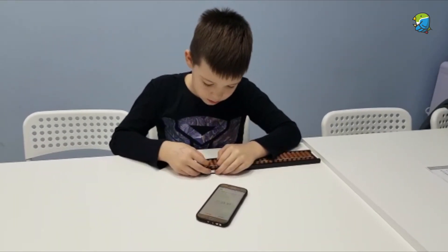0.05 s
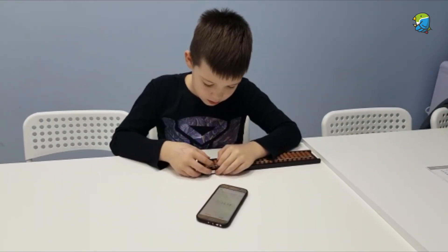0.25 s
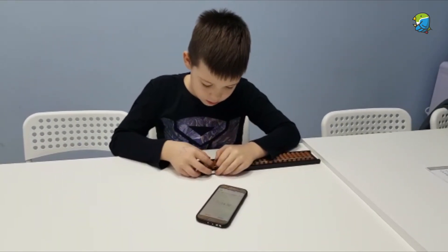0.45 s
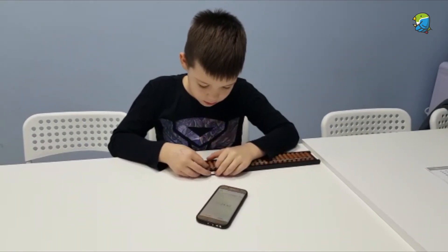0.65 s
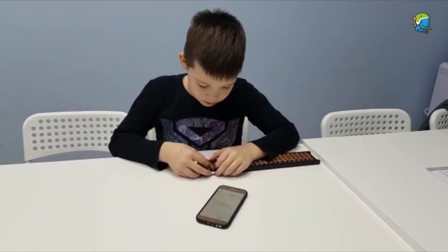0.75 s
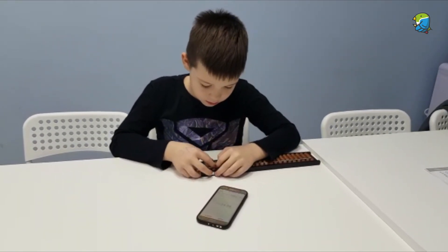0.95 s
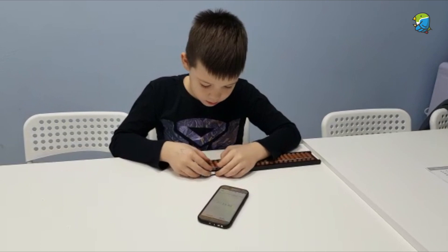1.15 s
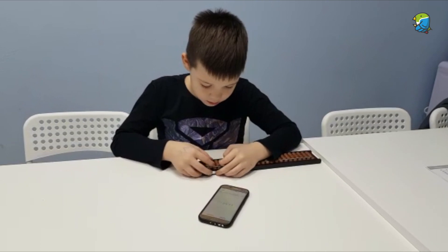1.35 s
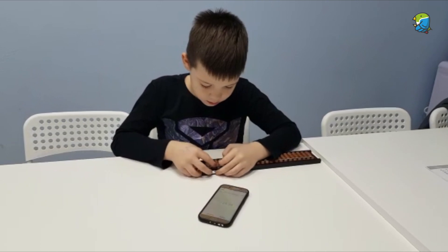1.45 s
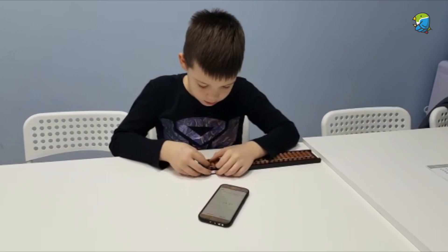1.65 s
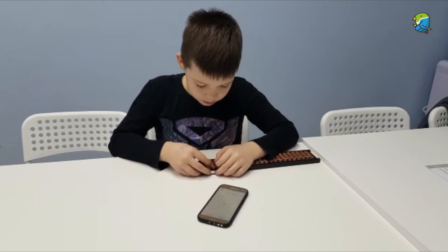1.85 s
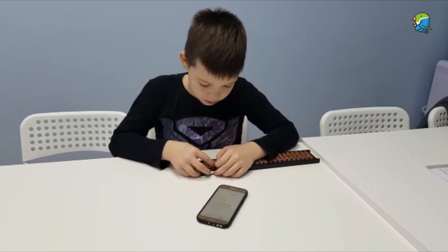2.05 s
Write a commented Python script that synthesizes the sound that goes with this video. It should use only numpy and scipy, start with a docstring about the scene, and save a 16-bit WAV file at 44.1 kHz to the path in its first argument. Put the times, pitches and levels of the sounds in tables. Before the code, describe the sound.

Quick, crisp clicks of abacus beads flicked by fingers, with a short room echo.

```python
"""Abacus beads, flicked by fingers; the abacus lies on a table in a small, bare room.
Each flick is a few ms of chatter between beads and bar that rings the frame.
Fingers nudge beads softly in between. The walls answer every click with a bright tail,
over a low room rumble, a hum and faint hiss."""
import sys
import numpy as np
from scipy import signal
from scipy.fft import rfft, irfft
from scipy.io import wavfile

SR = 44100
rng = np.random.default_rng(int(sys.argv[2]) if len(sys.argv) > 2 else 0)


def unload_audio(sound):
    """Save the sound as a 16-bit wav file, at the path given as the first command line argument."""
    columns = np.transpose(np.atleast_2d(sound))
    # keep every value between -1 and 1, then stretch to whole-number steps
    steps = np.round(np.clip(columns, -1, 1) * 32767)
    wavfile.write(sys.argv[1], SR, steps.astype(np.int16))


N = 92610
LEVEL_SPAN_S = 0.0079  # click and nudge levels: energy as rms over this span


def undb(db):
    """dB to gain."""
    return 10 ** (np.asarray(db) / 20)


def unit(x):
    """Scale to unit energy."""
    return x / np.sqrt(np.sum(x ** 2) + 1e-18)


def curve(points, hz):
    """Interpolate (frequency [Hz], value) points over log frequency."""
    p = np.array(points, float)
    return np.interp(np.log(hz + 1), np.log(p[:, 0]), p[:, 1])


def colour(x, points, size=1024):
    """Minimum-phase filter from (frequency [Hz], gain [dB]) points."""
    cepstrum = irfft(np.log(undb(curve(points, np.fft.rfftfreq(size, 1 / SR)))))
    cepstrum[1:size // 2] *= 2
    cepstrum[size // 2 + 1:] = 0
    return signal.fftconvolve(x, irfft(np.exp(rfft(cepstrum))))[:len(x)]


def delay(x, lag_s):
    """Circular fractional delay."""
    return irfft(rfft(x) * np.exp(-2j * np.pi * np.fft.rfftfreq(len(x), 1 / SR) * lag_s), len(x))


def add(out, time_s, x):
    """Mix x into out at time_s."""
    i = max(int(time_s * SR), 0)
    out[i:i + len(x)] += x[:max(len(out) - i, 0)]


def rumble_and_hiss(mid_db=-55.5, widen_hz=596):
    """Building rumble, alike on both sides, under wide faint hiss."""
    # noise spectrum (frequency [Hz], relative level [dB])
    spectrum = [(15, -54), (25, -13), (49, -6), (84, -4.5), (111, -12.5), (153, -17), (185, -14),
                (309, -25), (796, -34.5), (1440, -38), (1560, -35.5), (1700, -39), (2050, -39.5),
                (2840, -37.5), (8360, -42), (14800, -36.5), (16000, -38)]
    hz = np.fft.rfftfreq(N, 1 / SR)
    mid_bins, side_bins = rfft(rng.standard_normal((2, N))) * undb(curve(spectrum, hz))
    mid = irfft(mid_bins, N)
    side = irfft(side_bins * np.sqrt(hz / (hz + widen_hz)), N)
    return np.array([mid + side, mid - side]) * undb(mid_db) / mid.std()


def hum(centre_hz=59, width_hz=2.9, level_db=-63):
    """Low, wavering room hum: narrow-band noise."""
    hz = np.fft.rfftfreq(N, 1 / SR)
    band = np.exp(-((hz - centre_hz) / width_hz) ** 2)
    x = irfft(rfft(rng.standard_normal(N)) * band, N)
    return undb(level_db) * x / x.std()


def wall_reflections(x, gap_s=0.0005, rise_s=0.017, shared=0.15, size=32768):
    """Dense stereo reflections: fast build-up, treble dies first."""
    # room tail (band centre [Hz], gain [dB], t60 [s])
    bands = [(278, 12.5, 0.69), (648, 4, 0.34), (1300, -3, 0.33), (2500, -0.5, 0.33), (4540, -2.5, 0.33),
             (6220, -8.5, 0.34), (9230, 2, 0.31), (12000, -4, 0.3), (15500, -2.5, 0.15)]
    t, hz = np.arange(size) / SR, np.fft.rfftfreq(size, 1 / SR)
    noise = rng.standard_normal((3, size))
    noise_bins = rfft(np.sqrt(1 - shared) * noise[:2] + np.sqrt(shared) * noise[2])
    rise = np.clip((t - gap_s) / rise_s, 0, 1)
    tail = 0
    for centre_hz, db, t60_s in bands:
        band = curve([(row[0], row[0] == centre_hz) for row in bands], hz)
        envelope = unit(rise * np.exp(-np.log(1000) * t / t60_s))
        tail = tail + undb(db) * irfft(noise_bins * band) * envelope
    return signal.fftconvolve(x[None], tail, axes=1)[:, :N]


def contact_force(length_ms, count=6, decay_s=0.00026, fade_db=2.5, scatter_db=1.5, size=4096):
    """Quick run of tiny bead contacts, flattened to an even, broad spectrum."""
    t, hz = np.arange(size) / SR, np.fft.rfftfreq(size, 1 / SR)
    positions = (np.arange(count) + rng.random(count)) / count
    positions[0] = 0
    force = np.zeros(size)
    for position in positions:
        db = scatter_db * rng.standard_normal() - fade_db * position
        contact = undb(db) * rng.standard_normal(size) * np.exp(-t / decay_s)
        add(force, position * length_ms / 1000, contact)
    kernel = np.exp(-((hz - hz[size // 4]) / 650) ** 2)  # smooths over +-650 Hz
    power = signal.fftconvolve(abs(rfft(force)) ** 2, kernel, "same")
    return colour(force, np.column_stack([hz + 1, -10 * np.log10(power + 1e-9)]))


def chatter(length_ms, crack_db=11.5, ring_db=-7, detune=0.01):
    """Contacts crack and ring the modes of frame and beads."""
    # frame and bead modes (frequency [Hz], level before weighting [dB], t60 [s])
    modes = [(623, 4, 0.055), (774, 2.5, 0.091), (913, -4, 0.038), (1006, 2, 0.05), (1154, 2, 0.035),
             (1307, -0.5, 0.069), (1552, 3.5, 0.037), (1934, 1, 0.11), (2140, -5.5, 0.05),
             (2817, -7, 0.045), (4047, -17.5, 0.024), (5227, -8.5, 0.019), (6200, -2, 0.03),
             (12100, 0.5, 0.0073)]
    # abacus radiation (frequency [Hz], gain [dB])
    radiation = [(100, -32.5), (300, -27.5), (470, -20), (660, -1.5), (1000, 6), (3500, 0), (6500, 9),
                 (8700, -6.5), (11300, 2), (12600, 0.5), (14000, 0), (16000, -15)]
    force = contact_force(length_ms)
    t = np.arange(len(force)) / SR
    body = undb(crack_db) * (t == 0)
    for mode_hz, db, t60_s in modes:
        detuned_hz = mode_hz * (1 + detune * rng.standard_normal())
        ring = np.cos(2 * np.pi * detuned_hz * t) * np.exp(-np.log(1000) * t / t60_s)
        weight = undb(ring_db) * np.sqrt(mode_hz / 4600)
        body = body + undb(db) * weight * unit(ring)
    return colour(signal.fftconvolve(force, body)[:len(force)], radiation)


def resonate(x, hz, lift_db, q=9.7):
    """Lift the resonance that the contact point favours."""
    return x + undb(lift_db) * signal.lfilter(*signal.iirpeak(hz, q, fs=SR), x)


def nudges():
    """Soft, duller contacts: a finger finds a bead and starts it sliding."""
    # bead nudges (time [s], level [dB], length [ms], tilt [dB/octave], resonance [Hz])
    events = [(0.139, -60, 4.6, -11.5, 960), (0.266, -44.5, 5.3, 6, 1150), (0.419, -49, 17, -1, 1990),
              (0.521, -45, 7.6, 2, 1530), (0.639, -39.5, 2.86, -2, 1940), (0.646, -56, 10.6, 1, 2020),
              (0.750, -44, 3, -2, 1570), (0.988, -53.5, 4.4, -6.5, 2500), (1.129, -46, 2.16, -6.5, 2850),
              (1.258, -39, 3, 0.5, 6370), (1.389, -49.5, 2.7, 2.5, 2800), (1.489, -56.5, 1.5, -3.5, 1430),
              (1.603, -46.5, 4, -0.5, 1300), (1.729, -43, 7.2, -2, 1040), (1.740, -44.5, 6.2, -6, 1930),
              (1.799, -39, 1.88, 0, 4810), (1.888, -46.5, 1.33, -6, 1020), (1.908, -48, 4.1, -1, 1087),
              (1.998, -53.5, 3.14, -10.5, 1500), (2.049, -50.5, 3.9, -6, 1450)]
    # soft-contact colour (frequency [Hz], gain [dB])
    softness = [(300, 5), (800, -8), (1800, 2), (3000, -1), (6000, -3.5), (9000, -12), (16000, -20.5)]
    out = np.zeros(N)
    for time_s, level_db, length_ms, tilt_db_oct, ring_hz in events:
        nudge = resonate(chatter(length_ms), ring_hz, lift_db=8.5)
        nudge = colour(nudge, [(hz, db + tilt_db_oct * np.log2(hz)) for hz, db in softness])
        add(out, time_s, undb(level_db) * np.sqrt(LEVEL_SPAN_S * SR) * unit(nudge))
    return out


def clicks():
    """Beads strike bar and neighbours. Rows: direct sound, feed to the walls."""
    # bead strikes (time [s], length [ms], direct path past the hands [dB], resonance [Hz],
    # lift [dB], then level [dB] in each of five bands)
    strikes = [(0.2141, 3.64, -2.5, 954, 12.5, -37, -41.5, -45, -38.5, -37.5),
               (0.2487, 4.54, -1, 1550, 5, -39.5, -37.5, -41.5, -40, -49.5),
               (0.4427, 1.98, -0.5, 5530, -12, -46, -40, -39.5, -30.5, -43.5),
               (0.4929, 1.58, 1, 1046, 4, -45.5, -41.5, -41.5, -39, -50),
               (0.6583, 3.44, 0, 1940, 7, -28.5, -31, -32.5, -29.5, -30.5),
               (0.7556, 3.77, 1, 1495, 1, -32, -29, -34, -31.5, -33),
               (1.0047, 2.42, -0.5, 5740, -4, -37, -35.5, -33, -29, -33),
               (1.0637, 1.59, 0, 1600, 2, -43.5, -37, -37.5, -35.5, -43),
               (1.119, 3.83, 3, 5000, -4, -43, -40.5, -36.5, -39.5, -56),
               (1.138, 2.05, 1, 1154, 4, -33.5, -38, -36, -34.5, -37.5),
               (1.2704, 1.97, 2.5, 5670, -15, -39, -37, -28.5, -25.5, -35.5),
               (1.5466, 1.5, 0, 5470, 0.5, -47, -46.5, -39.5, -31.5, -46),
               (1.5764, 1.41, 2, 1550, -8, -47.5, -41.5, -43, -39, -47.5),
               (1.7534, 2.95, 0, 974, 5.5, -35, -37.5, -39, -34.5, -35.5),
               (1.8300, 3.04, 2.5, 1060, -2, -40, -43, -43, -40, -47),
               (2.0240, 4.05, -0.5, 760, -1, -44.5, -51.5, -49.5, -48.5, -60.5)]
    # strike bands, knock to tick (low edge [Hz], high edge [Hz])
    bands = [(500, 1300), (1300, 2400), (2400, 4600), (4600, 9000), (9000, 16000)]
    centres_hz = np.sqrt(np.prod(bands, axis=1))
    direct, to_walls = np.zeros(N), np.zeros(N)
    for time_s, length_ms, path_db, ring_hz, lift_db, *band_db in strikes:
        click = resonate(chatter(length_ms), ring_hz, lift_db)
        hz = np.fft.rfftfreq(len(click), 1 / SR)
        for _ in range(2):  # equalise toward this strike's band levels
            power = 2 * abs(rfft(click)) ** 2 / (len(click) * LEVEL_SPAN_S * SR)
            now_db = 10 * np.log10([power[(hz >= lo) & (hz < hi)].sum() for lo, hi in bands])
            click = colour(click, np.column_stack([centres_hz, band_db - now_db]))
        add(direct, time_s, undb(path_db) * click)
        add(to_walls, time_s, click)
    return np.array([direct, to_walls])


def scene(shared=0.72, right_lag_s=0.00005):
    """The abacus reaches two microphone ports directly, off the table top and off the walls."""
    # frontal response of each port (frequency [Hz], gain [dB])
    left_port = [(500, -5), (1900, -0.5), (2400, -2.5), (2900, 2.5), (3450, -2), (4150, -0.5), (5500, -3),
                 (6400, -6), (7500, 7.5), (9000, 3), (12500, 3), (15000, -2)]
    right_port = [(500, -3.5), (1900, -1.5), (2400, -3.5), (2900, 0.5), (3450, -14), (4100, 0),
                  (4700, -4.5), (5400, 8), (6400, -3.5), (7500, -15.5), (10000, 2.5), (12500, 2.5),
                  (15000, -11.5)]
    # slightly different sound per direction: front, left, right
    direct, to_walls = zip(*(clicks() + nudges() for _ in range(3)))
    front, *sides = direct
    left, right = (np.sqrt(shared) * front + np.sqrt(1 - shared) * side for side in sides)
    # table-top bounce
    left = left + undb(-14.5) * delay(left, lag_s=0.00046)
    right = right + undb(-15) * delay(right, lag_s=0.000682)
    near = np.array([colour(left, left_port), colour(delay(right, right_lag_s), right_port)])
    walls = sum(wall_reflections(x) for x in to_walls) / np.sqrt(3)
    return near + walls + rumble_and_hiss() + hum()


def record(dry, cutoff_hz=16000):
    """Steep recorder low-pass."""
    return signal.sosfilt(signal.ellip(8, .2, 70, cutoff_hz, fs=SR, output="sos"), dry)


dry = scene()
out = record(dry)
unload_audio(out)
```